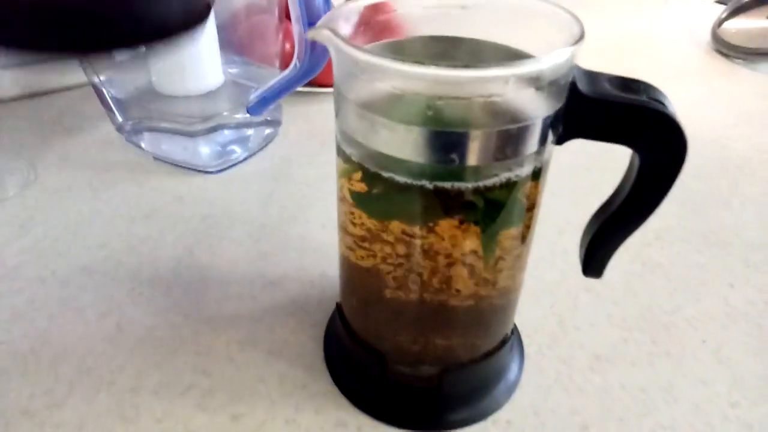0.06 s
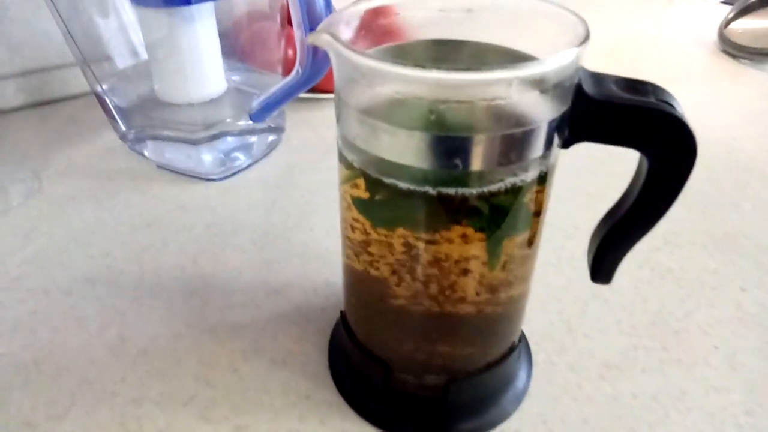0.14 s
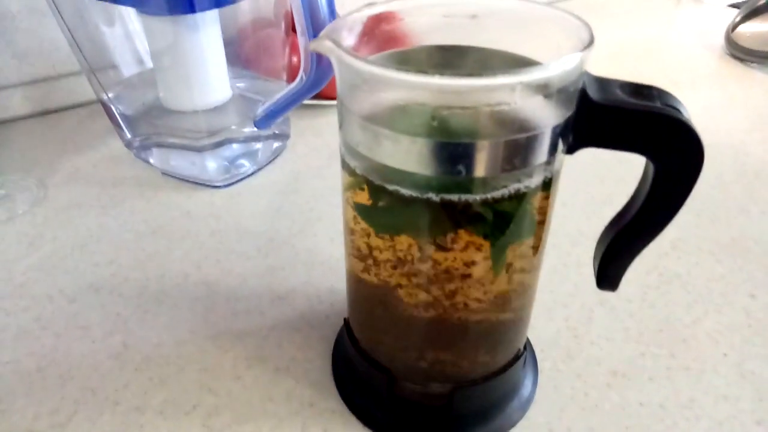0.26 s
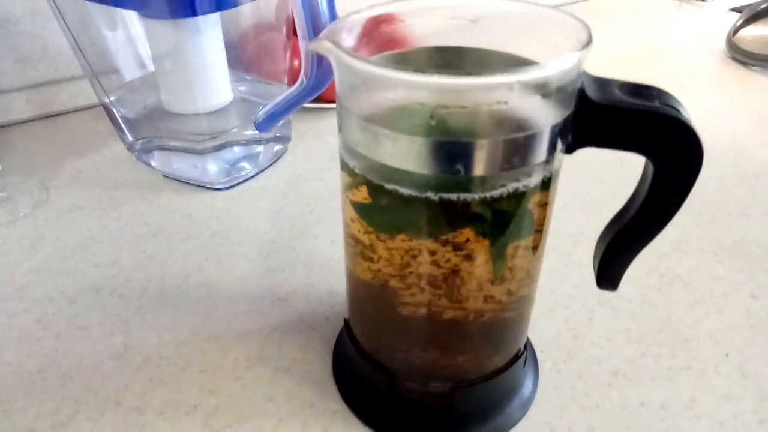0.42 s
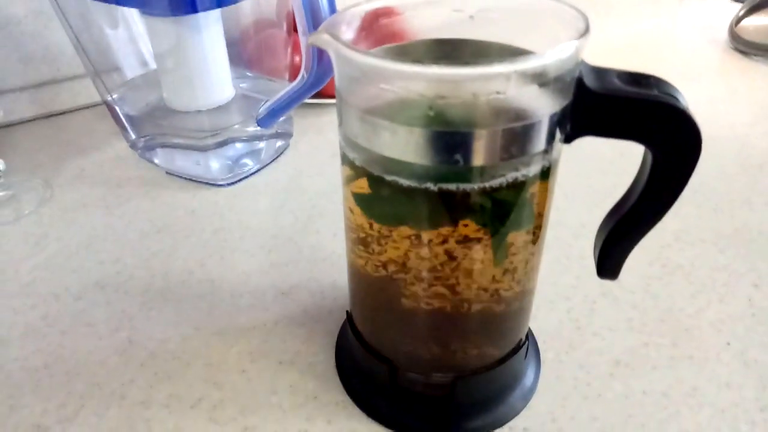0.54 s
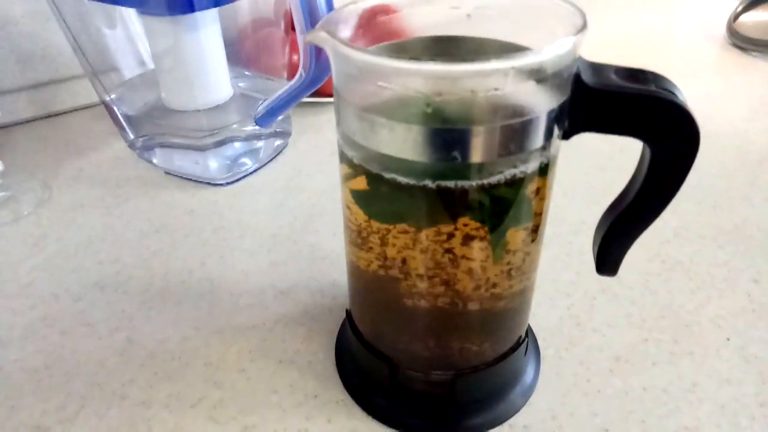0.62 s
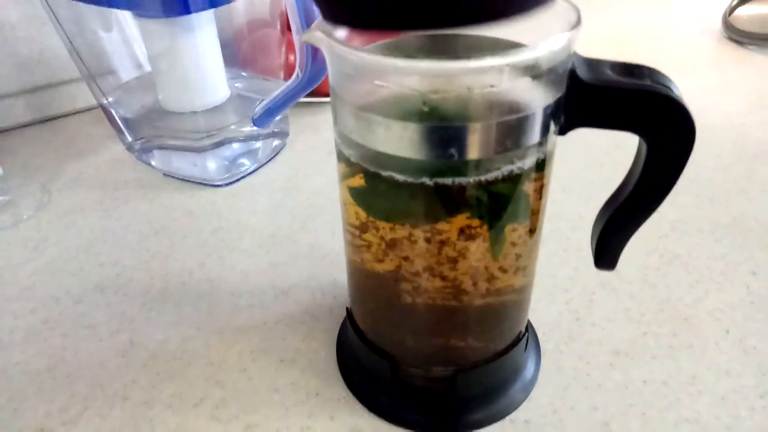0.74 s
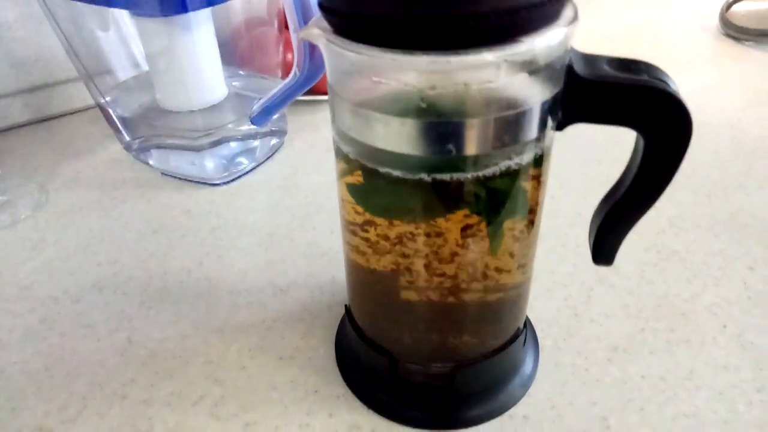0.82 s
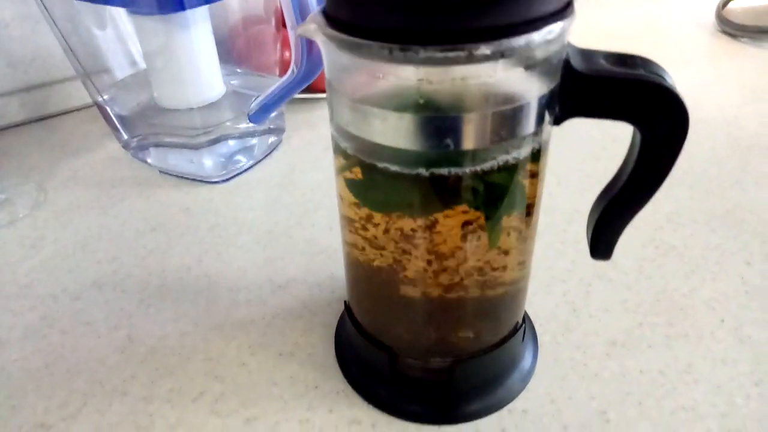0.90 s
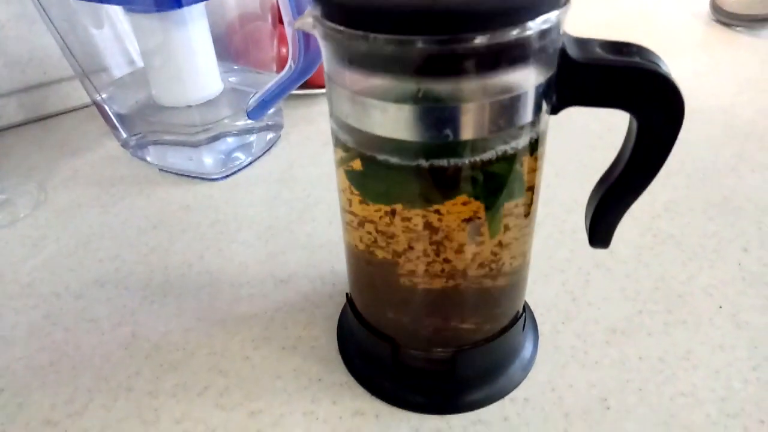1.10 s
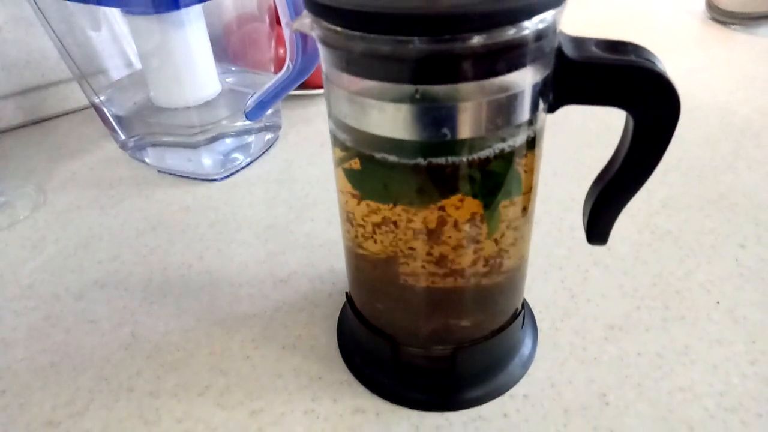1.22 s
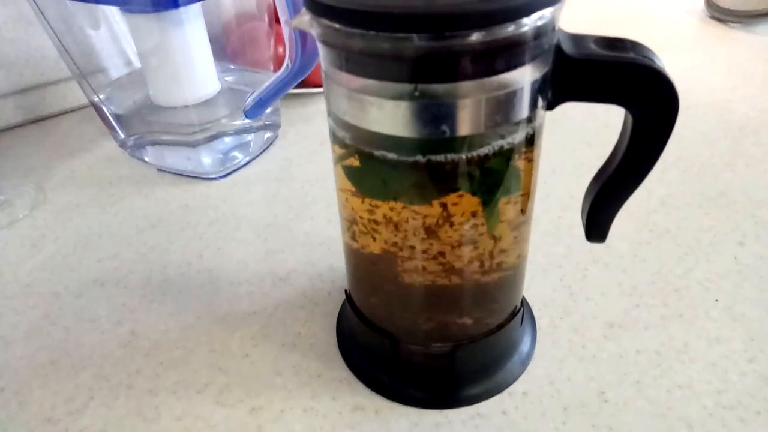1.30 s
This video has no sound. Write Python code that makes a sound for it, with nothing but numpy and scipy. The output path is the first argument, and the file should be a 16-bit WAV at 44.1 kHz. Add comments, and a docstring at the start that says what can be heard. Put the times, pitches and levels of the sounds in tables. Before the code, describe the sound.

A plastic and metal lid is fitted onto a glass carafe in a kitchen. Two soft handling bumps touch the right microphone at 0.2 and 0.3 seconds. The plunger knocks the rim around 0.45 seconds, clacks sharply into the glass near 0.65, then scrapes lightly down from 0.7. The lid seats with a double knock at 0.85, and a faint tick follows near 1.0. Low rubbing and faint hiss continue underneath.

```python
"""A plastic and metal press lid is set onto a glass carafe on a kitchen counter.
The plunger knocks the rim, clacks into the glass, scrapes down; the lid seats with a double knock.
Each contact is a pressure pulse, a noise crack, a hollow note and damped modes, with a short room tail.
Two soft handling bumps reach the right microphone over low rubbing and a faint hiss."""
import sys
import numpy as np
from scipy import signal
from scipy.fft import rfft, irfft
from scipy.io import wavfile
from scipy.ndimage import uniform_filter1d

SR = 44100
rng = np.random.default_rng(int(sys.argv[2]) if len(sys.argv) > 2 else 0)


def pcm_store(signal):
    """Save signal as 16-bit PCM."""
    levels = np.round(np.clip(np.atleast_2d(signal), -1, 1) * 32767)
    wavfile.write(sys.argv[1], SR, levels.astype(np.int16).T)


N = 59535

# left-right coherence of crack and hollow tone: f/Hz, coherence/0-1
CRACK_COHERENCE = [(200, 0.63), (700, 0.82), (1500, 0.1), (5000, 0)]
# left-right coherence of room tail, rub and rumble: f/Hz, coherence/0-1
ROOM_COHERENCE = [(150, 0.94), (400, 0.91), (900, 0.11), (3000, 0.041)]


def amp(db):
    """Decibels to gain."""
    return 10 ** (np.asarray(db) / 20)


def at_hz(points, hz):
    """Interpolate (f/Hz, value) on a log-frequency axis."""
    f, value = np.transpose(points)
    return np.interp(np.log(hz + 1), np.log(f + 1), value)


def envelope(points):
    """(t/s, level/dB) to gain per sample."""
    return amp(np.interp(np.arange(N) / SR, *np.transpose(points)))


def pan(db):
    """Stereo gains, left over right by db."""
    return amp(np.array([[db], [-db]]) / 2)


def add(mix, start_s, sound):
    """Mix in a stereo sound at start_s."""
    part = mix[:, max(round(start_s * SR), 0):][:, :sound.shape[1]]
    part += sound[:, :part.shape[1]]


def white_pair(coherence, size):
    """Stereo white noise with frequency-dependent coherence."""
    left, independent = rfft(rng.standard_normal((2, size)))
    shared = np.clip(at_hz(coherence, np.fft.rfftfreq(size, 1 / SR)), -1, 1)
    right = shared * left + np.sqrt(1 - shared ** 2) * independent
    return irfft(np.array([left, right]), size)


def shaped(noise, spectrum):
    """Shape noise by (f/Hz, level/dB); rms 1."""
    y = irfft(rfft(noise) * amp(at_hz(spectrum, np.fft.rfftfreq(N, 1 / SR))), N)
    return y / y.std()


def colour(x, response, size=4096):
    """Minimum-phase filter from (f/Hz, level/dB)."""
    log_gain = np.log(amp(at_hz(response, abs(np.fft.fftfreq(size, 1 / SR)))))
    taps = np.fft.ifft(np.exp(np.conj(signal.hilbert(log_gain)))).real[:size // 2]
    return signal.fftconvolve(x, taps[None], axes=1)[:, :x.shape[1]]


def hiss():
    """Faint background hiss, stronger on the left."""
    # spectrum per side: f/Hz, level/dB
    left_spectrum = [(20, -2), (200, 6), (500, 3), (740, -3.5), (1150, 2.5), (1600, 1), (2300, 3.5),
                     (2900, -5.5), (4000, -1), (6000, -6), (8200, -12.5), (10500, -5), (13000, -15.5),
                     (15300, -2.5)]
    right_spectrum = [(20, 16), (200, 2), (500, -9), (740, 2.5), (1150, -12), (1600, 2.5), (2400, -2),
                      (4000, -6), (6000, -2.5), (8200, -8), (10300, 1), (13000, -51), (15300, -10)]
    # envelope: t/s, level/dB
    levels = [(0, -58.5), (.09, -60.5), (.19, -54.5), (.35, -59), (.45, -50), (.6, -56), (1.1, -58.5),
              (1.35, -65)]
    left, right = rng.standard_normal((2, N))
    bed = np.array([shaped(left, left_spectrum), amp(-9) * shaped(right, right_spectrum)])
    return envelope(levels) * bed


def swish(peak_s=0.31, half_width_s=0.24):
    """Brighter hiss swelling on the left as the lid is carried over."""
    # spectrum: f/Hz, level/dB
    spectrum = [(100, -42), (2700, -5), (3700, 7.5), (4500, -1), (6000, -2.5), (8500, -8.5), (11000, -3),
                (13000, -10.5), (16000, -9.5)]
    swell = amp(-63.5) * np.exp(-((np.arange(N) / SR - peak_s) / half_width_s) ** 2)
    return pan(db=15) * swell * shaped(rng.standard_normal((2, N)), spectrum)


def hollow_tone():
    """Faint background noise band near 1 kHz."""
    # spectrum: f/Hz, level/dB
    spectrum = [(100, -50), (820, -14), (940, 3.5), (1020, 3.5), (1130, -14), (3000, -50)]
    # envelope: t/s, level/dB
    levels = [(0, -76.5), (.2, -72), (.6, -66.5), (.9, -72), (1.17, -75.5), (1.27, -67.5), (1.35, -73)]
    return pan(db=3) * envelope(levels) * shaped(white_pair(CRACK_COHERENCE, N), spectrum)


def rub():
    """Hollow rubbing of hand and plunger."""
    # spectrum: f/Hz, level/dB
    spectrum = [(20, -26), (50, -49), (100, 0.5), (160, -4.5), (270, 0.5), (420, -9.5), (700, -17),
                (2000, -47), (16000, -80)]
    # envelope: t/s, level/dB
    levels = [(0, -60), (.05, -62), (.12, -72), (.24, -55), (.36, -62), (.42, -55.5), (.6, -55),
              (.72, -51.5), (.9, -53.5), (1.06, -57), (1.14, -61), (1.2, -73), (1.235, -58.5),
              (1.29, -72.5), (1.35, -62)]
    return pan(db=1.5) * envelope(levels) * shaped(white_pair(ROOM_COHERENCE, N), spectrum)


def bumps():
    """Soft low wobbles from fingers shifting beside the right microphone."""
    # bumps: t/s, lowest f/Hz, level/dB, tilt/(dB/octave)
    events = [(0.2004, 90.7, -34, 1), (.331, 78, -31, -6)]
    # swells of one bump: delay/s, half width/s, frequency ratio, level/dB
    swells = [(0.00091, 0.0097, 1, -1), (0.0142, 0.011, 1.6, -0.5), (0.0021, 0.0051, 2.5, -1),
              (.009, 0.0049, 4.3, -3.5)]
    right = np.zeros(N)
    for time_s, hz, db, tilt_db in events:
        for delay_s, half_width_s, ratio, swell_db in swells:
            t = np.arange(N) / SR - time_s - delay_s
            swell = amp(db + swell_db + tilt_db * np.log2(ratio)) * np.exp(-(t / half_width_s) ** 2)
            right += swell * np.sin(2 * np.pi * (hz * ratio * t + rng.random()))
    return np.array([np.zeros(N), right])


def rumble():
    """Deep rumble as the lid is moved and the plunger goes down."""
    # spectrum: f/Hz, level/dB
    spectrum = [(20, -5), (40, -10.5), (55, 1.5), (80, -11.5), (150, -10.5), (1000, -76)]
    # envelope: t/s, level/dB
    levels = [(0, -105), (.28, -61.5), (.64, -84), (.69, -50), (.76, -60), (.84, -65), (.89, -51.5),
              (.96, -72), (1.01, -57.5), (1.2, -88), (1.35, -93)]
    return pan(db=1.5) * envelope(levels) * shaped(white_pair(ROOM_COHERENCE, N), spectrum)


def push(t, width_s=0.00032):
    """One pressure pulse as the parts meet."""
    pulse = t / width_s * np.exp(-t / width_s)
    return amp(-8.5) * pulse / pulse.sum()


def crack(t, t60_s, rise_s=0.0003):
    """Dense, fast-dying vibration of the plastic, with its scatter off the counter."""
    # spectrum: f/Hz, level/dB
    spectrum = [(100, -2.5), (450, -3.5), (1000, 0.5), (1700, -5.5), (2500, -3.5), (3300, -2),
                (3900, -10.5), (4900, -8.5), (6400, -5), (8200, -10), (10500, -6), (13000, -15),
                (15000, -8.5)]
    burst = (1 - np.exp(-t / rise_s)) * np.exp(-np.log(1000) * t / t60_s)
    return colour(white_pair(CRACK_COHERENCE, len(t)) * burst / np.linalg.norm(burst), spectrum)


def damped_mode(t, hz, peak_db, t60_s):
    """Impulse response of one resonance with spectral peak peak_db."""
    rate = np.log(1000) / t60_s
    return amp(peak_db) * 2 * rate / SR * np.exp(-rate * t) * np.cos(2 * np.pi * hz * t)


def knock(t, hz, db):
    """Brief hollow note of the lid; pitch depends on how it sits in the glass."""
    return damped_mode(t, hz, db, t60_s=0.012)


def ring(t, rise_s=0.00017):
    """Damped modes of lid and carafe."""
    # modes: f/Hz, level/dB, t60/s, left-right/dB
    modes = [(195.5, 4, 0.11, -4), (246.7, 4, 0.059, -5), (320, 5.5, 0.065, -1.5), (542.4, 4, 0.034, -4),
             (721, 2.5, 0.049, -12), (953, 8.5, 0.055, 6.5), (1235, 3, 0.032, 9.5), (1336, -10, 0.039, 9),
             (1416, 4, 0.064, 6), (1560, -9, 0.083, -25), (2297, 6, 0.03, -1), (3000, 3, 0.022, 4),
             (3350, 1, .018, 1), (4408, 1, 0.023, 3), (10150, -0.5, 0.022, -11)]
    ringing = sum(pan(pan_db) * damped_mode(t, hz, db, t60_s) for hz, db, t60_s, pan_db in modes)
    return ringing * (1 - np.exp(-t / rise_s))


def kitchen(t, rise_s=0.011):
    """Diffuse room response; each band decays at its own rate."""
    # decay: f/Hz, t60/s
    decay_times = [(100, 0.64), (280, 0.13), (600, 0.4), (1200, 0.59), (3000, 0.51), (7000, 0.2),
                   (14000, 0.09)]
    # tail spectrum: f/Hz, level/dB
    spectrum = [(100, 2), (280, 0), (600, 2), (1100, 0.5), (1800, 2), (3000, 1), (7000, 2.5), (14000, 5.5)]
    hz, frame_s, bands = signal.stft(white_pair(ROOM_COHERENCE, len(t)), SR, nperseg=256)
    rate = np.log(1000) / at_hz(decay_times, hz)[:, None]
    decay = np.exp(-rate * frame_s) * np.sqrt(2 * rate / SR)  # unit energy per band
    bands = bands * decay * amp(at_hz(spectrum, hz))[:, None]
    tail = signal.istft(bands, SR, nperseg=256)[1][:, :len(t)]
    return pan(db=3.5) * tail * (1 - np.exp(-(t / rise_s) ** 2))


def contacts(size=32768, notes_send_db=-4.5, left_lag_s=0.0004, bass_cut_hz=172):
    """Lid strikes carafe, coloured by where and how hard it lands; the room answers."""
    # colour bands: f/Hz
    bands_hz = [220, 450, 750, 1200, 1800, 3200, 10000]
    # hits: t/s, level/dB x 7 bands, knock f/Hz, knock level/dB, crack t60/s, room/dB, left-right/dB
    hits = [ (0.4341, 4, -3, -7.5, -2, -9.5, -5, -26.5, 308, 3.5, 0.083, -11.5, 4.5),
            (0.4783, 5.5, 8.5, 10.5, 5.5, -3.5, -5, -18.5, 654, 5.5, 0.024, -7, 2.5),
            (.4835, 12, -4, 4, -5.5, -0.5, -19, -23, 210, 0.5, 0.04, -9, 3.5),
            (0.4896, 2, -8, -3, -8, -9, -15, -28, 950, -2, .02, -4, -3),
            (0.5436, -32, -0.5, -16, -28, -14, -17.5, -38, 900, -2, 0.042, 1, 5),
            (.6390, -12, -12, -3, -22, -7, -14, -31, 443, 0.5, .04, 0, 4.5),
            (0.6456, -18, -11, -19.5, -15, -15, -5.5, -26, 450, 7.5, 0.035, 7, -6),
            (0.6639, 9.5, -9.5, 7, 18.5, 7, 12, 0.5, 1010, -1.5, 0.042, -9, 1.5),
            (0.672, 7.5, -0.5, 2.5, 7.5, 5, 1, -7.5, 267, -3, 0.069, -6.5, 3),
            (.6850, 2.5, -1.5, -6.5, -4, 2, -3.5, -10.5, 280, 2.5, 0.041, -3.5, 2.5),
            (.7120, -4.5, -9, 4.5, -0.5, -8, -6.5, -17, 910, -13, 0.11, -7.5, 3),
            (0.7712, -21, -13, -23, -10, -24, -9.5, -13.5, 950, -10, 0.038, -28, 4),
            (0.8442, -5, -2.5, 3, -18.5, -12, -7, -33, 800, 9.5, 0.032, -21, 1),
            (.8622, -4, -3.5, 4.5, -7.5, -10, -14, -18, 705, 13.5, 0.012, -6.5, 5.5),
            (.8645, -0.5, 6.5, 0, -1.5, -7, -4.5, -24.5, 770, 7.5, 0.025, -6, 2.5),
            (1.0334, -17, -24, -25, -24, -25.5, -23.5, -25, 260, -4, 0.11, -14, 4)]
    out, t = np.zeros((2, N)), np.arange(size) / SR
    for start_s, *bands_db, knock_hz, knock_db, t60_s, room_db, pan_db in hits:
        click = push(t) + crack(t, t60_s)
        notes = knock(t, knock_hz, knock_db) + ring(t)
        room = signal.fftconvolve(click + amp(notes_send_db) * notes, kitchen(t), axes=1)[:, :size]
        sound = pan(pan_db) * (click + notes) + amp(room_db) * room
        add(out, start_s, colour(sound, list(zip(bands_hz, bands_db))))
    out[0] = np.roll(out[0], round(left_lag_s * SR))
    return signal.sosfilt(signal.butter(4, bass_cut_hz, "high", fs=SR, output="sos"), out)


def scrape(grain_db=1.5):
    """Light, grainy scrape of the plunger along the glass."""
    # spectrum: f/Hz, level/dB
    spectrum = [(100, -11), (600, -18), (1100, 8.5), (2400, 6.5), (4000, 3.5), (6300, 5), (8200, -11),
                (10500, -4), (16000, -12)]
    # envelope: t/s, level/dB
    levels = [(0, -93), (.68, -100), (.73, -48), (.8, -55.5), (.9, -63.5), (1.06, -63), (1.16, -67),
              (1.25, -67.5), (1.35, -68)]
    grain = uniform_filter1d(rng.standard_normal(N), size=90)
    friction = rng.standard_normal((2, N)) * amp(grain_db * grain / grain.std())
    return pan(db=5) * envelope(levels) * shaped(friction, spectrum)


def scene():
    """All sources at the two microphones."""
    return hiss() + swish() + hollow_tone() + rub() + rumble() + scrape() + bumps() + contacts()


def record(dry):
    """Low cut and band limit."""
    low_cut_hz, edge_hz = 23, 15900
    hz = np.fft.rfftfreq(2 * N, 1 / SR)
    highpass = 1 - 1 / (1 + (hz / low_cut_hz) ** 6)
    cut = irfft(rfft(dry, 2 * N) * highpass)[:, :N]
    lowpass_taps = signal.firwin(401, edge_hz, window=("kaiser", 8), fs=SR)
    return signal.oaconvolve(cut, lowpass_taps[None], "same")


dry = scene()
out = record(dry)
pcm_store(out)
```